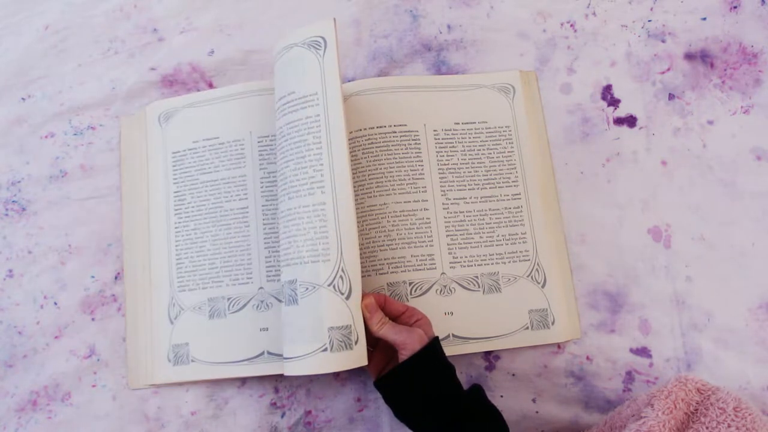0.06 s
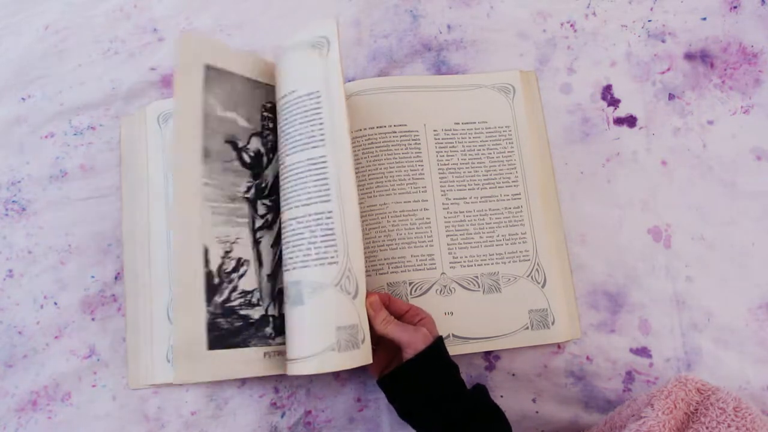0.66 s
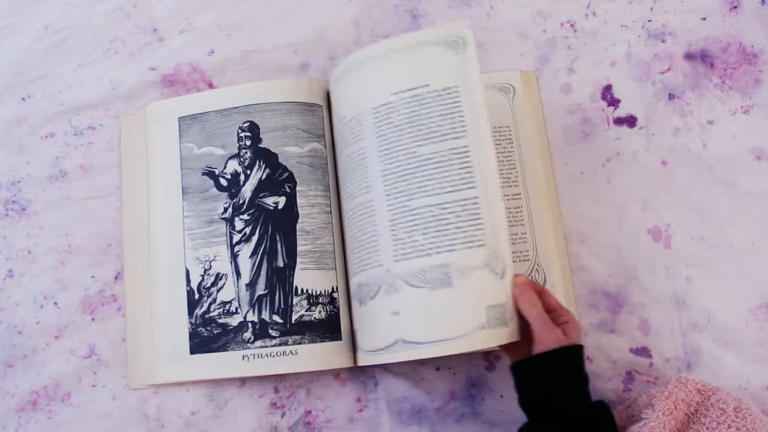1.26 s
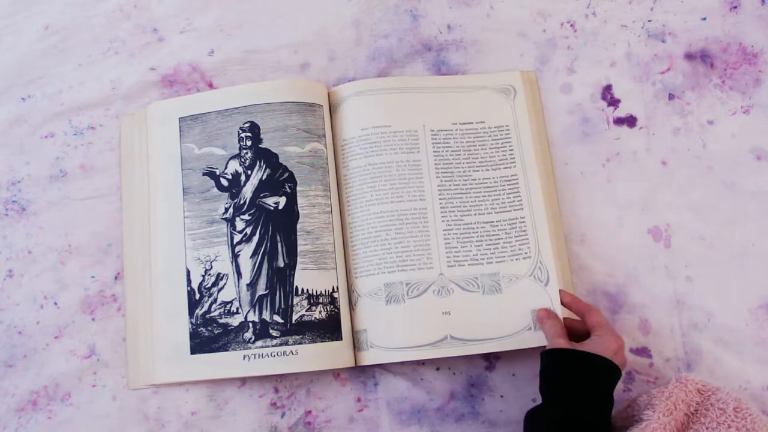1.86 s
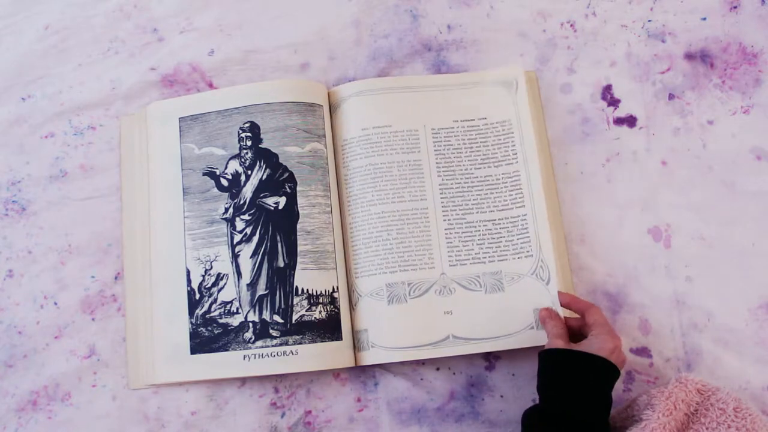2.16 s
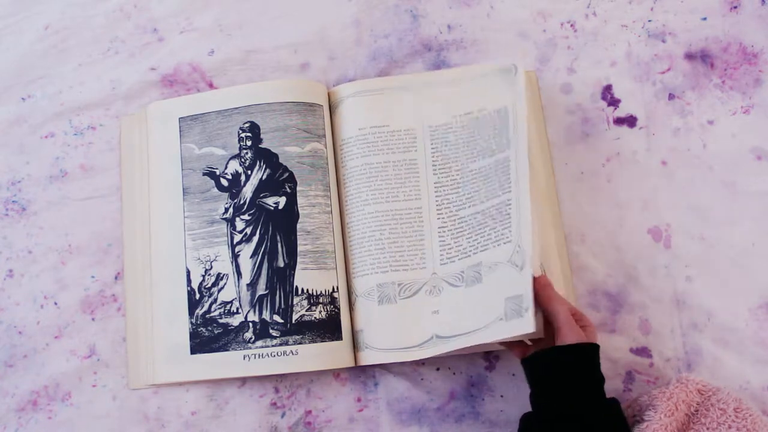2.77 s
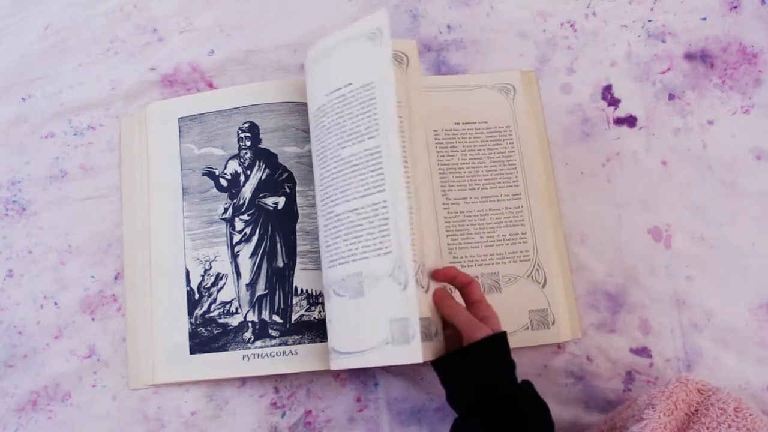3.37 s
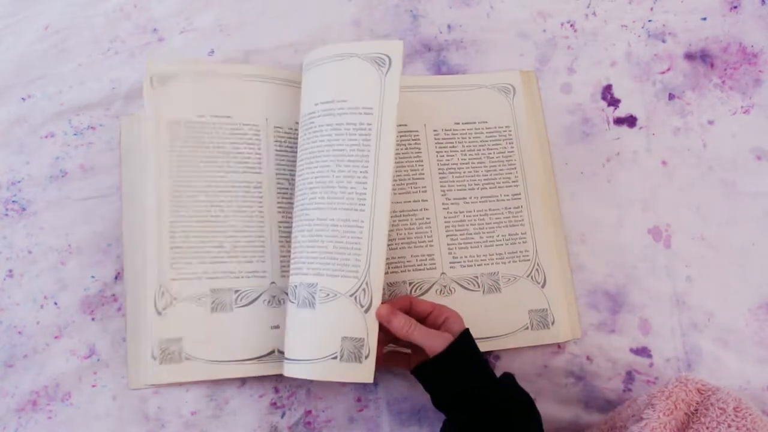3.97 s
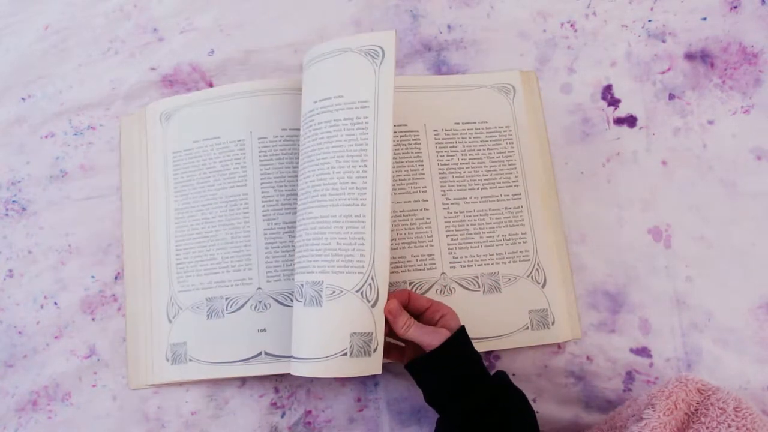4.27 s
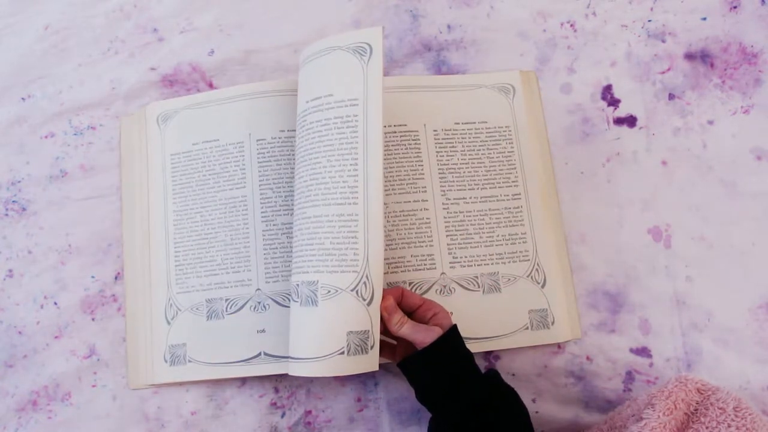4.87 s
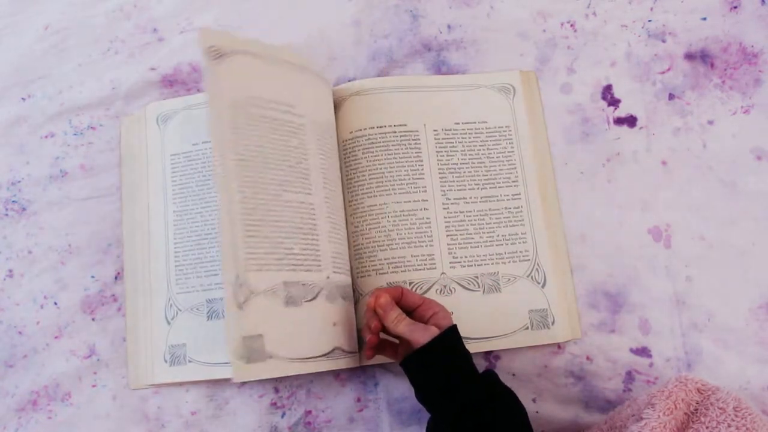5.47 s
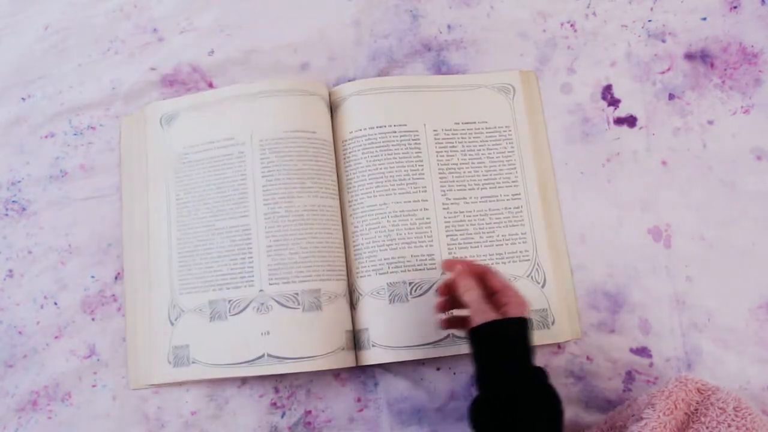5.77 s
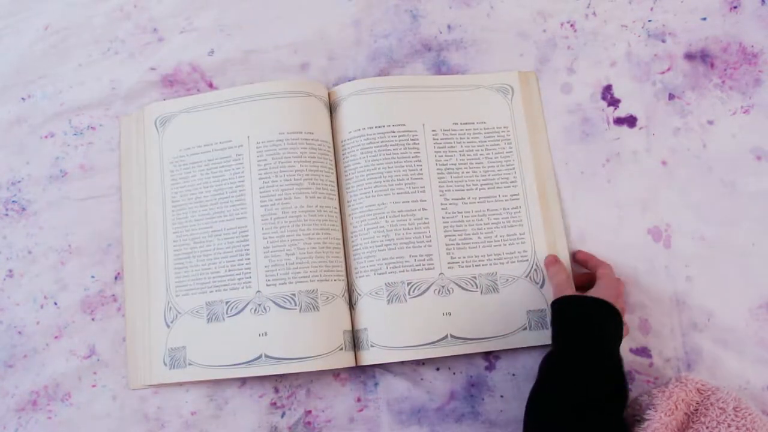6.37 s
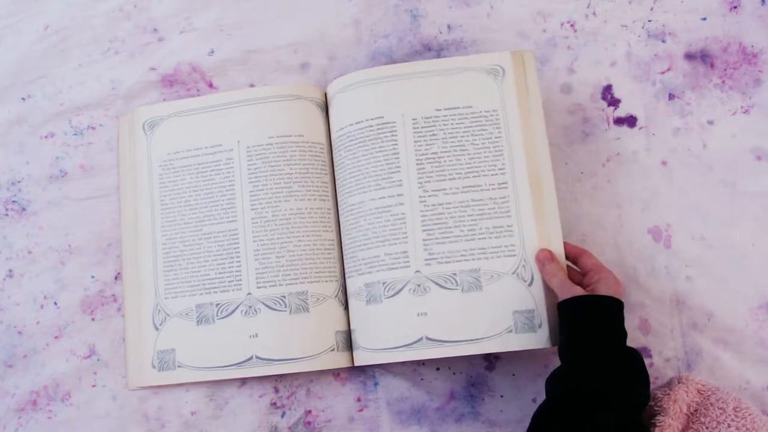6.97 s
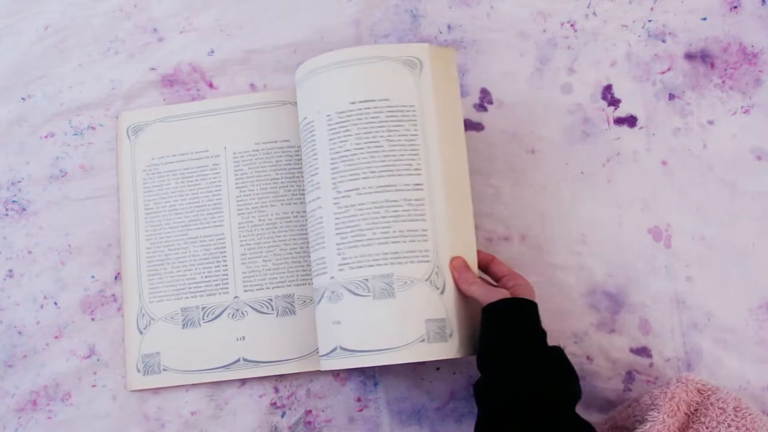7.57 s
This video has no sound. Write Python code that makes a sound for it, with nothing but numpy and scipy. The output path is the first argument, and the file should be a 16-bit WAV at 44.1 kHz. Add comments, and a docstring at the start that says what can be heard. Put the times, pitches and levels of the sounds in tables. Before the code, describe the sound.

Close paper sounds as someone leafs through a big book: sheets buckle, rub over each other and flop down, ringing slightly in the room.

```python
"""Pages of a large old book are turned by hand, close to the microphone, in a quiet but live room. First a page
edge brushes the fingers. Near 1.7 s the sheet buckles with dull snaps, and from 2.1 s it slides over its
neighbour with a hiss. More snaps and a softer slide follow from 3.1 s. Near 5.3 s a page is let go and flops
over; faint brushes and fingers rubbing the paper end the scene. The room rings on after every sound, over a
steady rumble and microphone hiss."""
import sys
import numpy as np
from scipy import signal
from scipy.fft import rfft, irfft, next_fast_len
from scipy.io import wavfile

SR = 44100
rng = np.random.default_rng(int(sys.argv[2]) if len(sys.argv) > 2 else 0)


def store_wav(level_fs):
    """Save 16-bit WAV to argv[1]."""
    pcm = np.round(np.clip(np.atleast_2d(level_fs), -1, 1) * 32767)
    wavfile.write(sys.argv[1], SR, pcm.T.astype(np.int16))


N = 340893
TIME_S = np.arange(N) / SR

# A bent sheet buckles. Each row: peak time in seconds, level in dB, centre in Hz, width in octaves,
# decay in seconds.
BUCKLE_EVENTS = [ (0.991, -54, 1270, 0.7, 0.021), (1.541, -60, 760, 0.6, 0.027),
                 (1.597, -54.5, 800, 0.78, .016), (1.6513, -25, 1220, 1.04, 0.0054),
                 (1.677, -23, 1110, 1.18, 0.0094), (1.901, -43, 1000, 1.32, 0.033),
                 (2.2401, -29.5, 2500, 1.47, 0.0037), (2.248, -44.5, 1110, 0.65, 0.029),
                 (2.278, -63, 2390, 1.3, 0.0021), (2.316, -36, 2300, 1.1, 0.0016),
                 (2.671, -48.5, 806, 1.4, 0.017), (3.0718, -30, 1420, 1.14, 0.0045),
                 (3.095, -44, 1000, 1.2, .02), (3.145, -40.5, 1170, 2.24, 0.015),
                 (3.156, -37.5, 1120, 1.95, 0.014), (3.215, -47, 970, 1.5, 0.061),
                 (3.549, -42.5, 760, 1.4, 0.01), (4.103, -59, 1000, 0.78, 0.032),
                 (5.111, -46.5, 1150, 1.4, 0.012), (5.151, -47, 1140, 1.65, 0.044),
                 (5.248, -28, 1520, 1.3, 0.0066), (5.273, -32, 2790, 0.62, 0.0045),
                 (5.75, -62, 1640, 0.29, .015), (6.279, -66.5, 770, .6, .02),
                 (6.8485, -45.5, 1190, 0.43, 0.0017)]
# A sheet slides over the next; the faint rows near 1.1, 1.6 and 6.65 s are fingers rubbing the paper. # Each
# row: peak time in seconds, level in dB, decay in seconds, relative hiss in dB, name of the rub colour.
SLIDE_EVENTS = [ (1.12, -67.5, 0.28, -7.5, "broad"), (1.58, -71, 0.21, 5.5, "broad"),
                (2.109, -37.5, 0.086, -23, "narrow"), (2.25, -40, 0.067, -20.5, "narrow"),
                (2.37, -42, 0.021, -6.5, "bright"), (2.422, -48, 0.11, -9, "bright"),
                (2.615, -52, 0.065, -13.5, "narrow"), (2.815, -61, 0.036, -12, "narrow"),
                (3.267, -52.5, 0.28, -11, "broad"), (3.554, -42, .02, -19.5, "broad"),
                (3.668, -54.5, 0.07, -3, "broad"), (3.882, -62, 0.064, -4, "broad"),
                (6.65, -71.5, .45, -6, "broad")]
# A page edge brushes past. Each row: peak time in seconds, level in dB, centre in Hz, decay in seconds,
# relative hiss in dB.
BRUSH_EVENTS = [ (0.073, -55.5, 2300, 0.041, -13), (0.141, -57.5, 2300, 0.037, -8.5),
                (0.453, -34, 2560, .001, -4), (0.47, -57, 2000, .05, -22), (1.663, -54, 3900, 0.067, -7),
                (1.836, -57.5, 4000, 0.049, -7), (1.984, -50.5, 3600, 0.0057, -6.5),
                (2.032, -44.5, 3870, .024, -10.5), (4.394, -52.5, 3400, 0.022, -11),
                (5.088, -51, 2730, 0.0024, -2), (5.099, -48, 2750, .005, -4.5),
                (5.107, -40, 2800, .005, -12.5), (5.881, -53.5, 2550, 0.011, 0),
                (5.911, -52, 3250, 0.025, -5), (6.022, -56.5, 3600, .003, -10)]
# Narrow resonances heard as a brief ring. Each row: frequency in Hz, width in Hz, relative gain in dB.
RING_MODES = [(685, 22, 0.5), (717, 33, 7.5), (815.4, 18, 12.5), (825, 140, 3), (895, 29, 8.5),
              (1133, 21, -18), (1158, 46, 1), (1259, 39, 11.5), (1379, 34, 7.5), (1516, 17, -2.5),
              (1607, 9, -12.5), (1600, 13, -0.5), (1704, 23, 8), (1806, 22, -2.5), (1930, 19, 1.5),
              (2054, 34, 3.5), (2380, 110, 1), (2600, 45, -2.5), (2780, 61.5, -14)]
# Colours of a slide's rub and hiss. Each row: frequency in Hz, relative level in dB.
NARROW_RUB_DB = [(400, -44), (1000, -18), (1500, -6), (2000, 3), (2450, 5), (3200, -2), (4000, -1),
                 (5000, -11.5), (6500, -28), (10000, -48)]
BRIGHT_RUB_DB = [(300, -22.5), (800, -24), (1300, -10.5), (1800, -3.5), (2500, -6.5), (3000, -2.5),
                 (4100, 0.5), (5500, -15), (8000, -15), (11000, -49)]
BROAD_RUB_DB = [(150, -24), (270, -7), (430, -11.5), (650, 2.5), (1000, -6.5), (1270, 0.5), (1700, -1.5),
                (2500, 1.5), (4500, -5), (8000, -39), (11000, -27)]
SLIDE_HISS_DB = [(3500, -25.5), (5500, -13.5), (6700, -14), (7800, -13), (9100, -15), (10300, -12.5),
                 (11800, -19.5), (15500, -22)]
# Colours of the flop's flap and crinkle. Each row: frequency in Hz, relative level in dB.
FLAP_COLOUR_DB = [(30, -60), (130, -26.5), (200, -17.5), (240, -7), (400, -3.5), (580, -4.5), (780, -7),
                  (1050, -3), (1300, -2.5), (1700, -0.5), (2100, -6.5), (2900, -30), (4000, -55.5)]
CRINKLE_COLOUR_DB = [(1200, -26), (1800, -1.5), (2150, -3), (2800, -2.5), (3300, -14.5), (4000, -19),
                     (4800, -36), (6000, -82), (9000, -47)]
# Room decay. Each row: frequency in Hz, time to fall 60 dB in seconds.
ROOM_T60_S = [(150, 1.5), (400, 0.68), (1040, 0.8062), (2760, 0.59), (7000, 1.23), (15000, 2.05)]
# Colours of the room's tail and of the noise floor. Each row: frequency in Hz, relative level in dB.
TAIL_COLOUR_DB = [(100, 7.5), (260, -1), (900, 0), (2500, 1), (6000, -2), (15000, -15)]
FLOOR_COLOUR_DB = [(22, -30), (38, -20.5), (50, -15), (64, 2), (110, 4.5), (180, 1.5), (400, -1),
                   (1000, -5), (2800, -8.5), (4400, -5.5), (6200, -9.5), (9000, -12), (12000, -10),
                   (15500, -7.5)]
# Stereo width of the noise floor. Each row: frequency in Hz, side relative to mid in dB.
FLOOR_SIDE_DB = [(60, -7), (180, -6), (550, -3.5), (1650, -1), (4970, -1), (15000, -1)]

HARD_BUCKLE_DB = -21.5   # reference for ring, crack and settling


def buckles():
    """A fold pops in a band set by its size, with a crack above and a thud of the whole sheet below."""
    out, texture = np.zeros(N), fibre_slips(spread_db=2, rate_hz=600)
    for peak_s, db, hz, octaves, rise_s, decay_s in buckles_with_settling():
        span, force, force_rms = slip_burst(texture, peak_s, rise_s, decay_s, snap=3.3)
        hardness_db = db - HARD_BUCKLE_DB
        fold = band(force, *band_edges_hz(hz, octaves), order=3)
        pop = unit_rms(short_ring(fold, ring_db=-3 + 0.28 * hardness_db))
        crack = unit_rms(band(force, low_hz=2160, top_hz=3500, order=3))
        thud = unit_rms(band(force, low_hz=270, top_hz=696, order=3))
        crack_gain = from_db(-16.5 + 0.42 * hardness_db)
        thud_gain = from_db(-8.5 - 11 * np.log2(hz / 1000))   # small, high folds shake the sheet less
        out[span] += from_db(db) * force_rms * (pop + crack_gain * crack + thud_gain * thud)
    return out


def buckles_with_settling():
    """Each buckle, then the softer flutter as the sheet settles; hard buckles shake it much more."""
    delay_s, flutter_rise_s, flutter_decay_s = 0.057, 0.022, 0.06
    flutter_hz, flutter_octaves = 1205, 1.7
    for peak_s, db, hz, octaves, decay_s in BUCKLE_EVENTS:
        yield peak_s, db, hz, octaves, 0.66 * decay_s, decay_s
        flutter_db = -42 + 1.67 * (db - HARD_BUCKLE_DB)
        yield peak_s + delay_s, flutter_db, flutter_hz, flutter_octaves, flutter_rise_s, flutter_decay_s


def flop(peak_s=5.265, landing_s=0.29):
    """The free page unrolls in dense soft buckles; the air pocket under it adds a hollow note."""
    t_s = TIME_S - peak_s
    landing_fade = np.exp(-(t_s / landing_s) ** 2)
    flap_gain = from_db(-28) * swell(t_s, rise_s=0.026, decay_s=0.23) * landing_fade
    flap_noise = coloured(fibre_slips(spread_db=0.4, rate_hz=440), FLAP_COLOUR_DB)
    flap = flap_gain * unit_rms(short_ring(flap_noise, ring_db=-3))
    crinkle_gain = from_db(-33) * swell(t_s, rise_s=0.014, decay_s=0.086)
    crinkle_noise = coloured(fibre_slips(spread_db=1, rate_hz=600), CRINKLE_COLOUR_DB)
    air_pocket = from_db(8) * resonance(flap, hz=280, width_hz=7)
    return flap + air_pocket + crinkle_gain * unit_rms(crinkle_noise)


def slides():
    """Paper on paper, or fingers on paper, in dense fine slips: a mid rub from the sheet, a hiss from its edge."""
    friction = moving_contact(fibre_slips(spread_db=1, rate_hz=700), depth=0.56)
    rubbing = short_ring(friction, ring_db=-12.5)
    hiss = unit_rms(coloured(friction, SLIDE_HISS_DB))
    colours = {"narrow": NARROW_RUB_DB, "bright": BRIGHT_RUB_DB, "broad": BROAD_RUB_DB}
    rubs = {name: unit_rms(coloured(rubbing, colour)) for name, colour in colours.items()}
    out = np.zeros(N)
    for peak_s, db, decay_s, hiss_db, name in SLIDE_EVENTS:
        envelope = swell(TIME_S - peak_s, 0.33 * decay_s, decay_s)
        out += from_db(db) * envelope * (rubs[name] + from_db(hiss_db) * hiss)
    return out


def moving_contact(x, depth):
    """As the line of contact moves, narrow peaks and dips come and go in the scrape."""
    centres_hz = np.geomspace(1900, 14000, 12)
    return x + depth * sum(drift(rate_hz=7.6) * resonance(x, hz, 0.039 * hz) for hz in centres_hz)


def brushes():
    """A page edge scratches the fingers, with fine hiss above and a little sheet body below."""
    out, texture = np.zeros(N), fibre_slips(spread_db=4, rate_hz=900)
    for peak_s, db, hz, decay_s, hiss_db in BRUSH_EVENTS:
        span, force, force_rms = slip_burst(texture, peak_s, 0.37 * decay_s, decay_s, snap=1.5)
        edge = band(force, *band_edges_hz(hz, octaves=1.66), order=3)
        scratch = unit_rms(short_ring(edge, ring_db=-2.5))
        hiss = from_db(hiss_db) * unit_rms(band(force, low_hz=6440, top_hz=12300))
        body = from_db(-11.5) * unit_rms(band(force, low_hz=392, top_hz=1240))
        out[span] += from_db(db) * force_rms * (scratch + hiss + body)
    return out


def fibre_slips(spread_db, rate_hz):
    """Paper fibres catch and let go: noise whose strength jumps from slip to slip."""
    slip_index = np.cumsum(rng.random(N) < rate_hz / SR)
    strength = from_db(spread_db * np.clip(rng.standard_normal(SR), -2, 2))
    return unit_rms(rng.standard_normal(N) * strength[slip_index % SR])


def slip_burst(texture, peak_s, rise_s, decay_s, snap):
    """Slips swell to one sudden give and fade; returns sample span, force and envelope rms."""
    start_s, end_s = max(peak_s - 6 * rise_s, 0), peak_s + 6 * decay_s + 0.12
    span = slice(int(start_s * SR), int(end_s * SR))
    envelope = swell(TIME_S[span] - peak_s, rise_s, decay_s)
    force = envelope * texture[span]
    force[np.argmax(envelope)] += snap
    return span, force, np.sqrt(np.mean(envelope ** 2))


def short_ring(x, ring_db):
    """Narrow resonances that add a brief ring to the paper sounds."""
    return x + sum(from_db(db + ring_db) * resonance(x, hz, width_hz) for hz, width_hz, db in RING_MODES)


def room_reverb(x, side_db):
    """The room's reflections: a nearly centred stereo tail, one second long."""
    send = coloured(x, TAIL_COLOUR_DB)
    mid, side = (signal.oaconvolve(send, diffuse_tail(TIME_S[:SR]))[:N] for _ in range(2))
    return mid + from_db(side_db) * side * [[1], [-1]]


def diffuse_tail(t_s, onset_s=0.0013):
    """Dense reflections, each octave dying at its own rate; unit energy."""
    white, edges_hz = rng.standard_normal((2, len(t_s))), np.geomspace(90, 18000, 9)
    tail = np.zeros(len(t_s))
    for k, (low_hz, top_hz) in enumerate(zip(edges_hz, edges_hz[1:])):
        t60_s = at_hz(ROOM_T60_S, np.sqrt(low_hz * top_hz))
        tail += band(white[k % 2], low_hz, top_hz) * from_db(-60 * t_s / t60_s)
    return unit_rms(tail * (1 - np.exp(-t_s / onset_s))) / np.sqrt(len(t_s))


def room_tone(mid_db):
    """Low rumble, mostly shared by both sides, under the microphone's own hiss."""
    mid, side = (unit_rms(coloured(white, FLOOR_COLOUR_DB)) for white in rng.standard_normal((2, N)))
    return from_db(mid_db) * (mid + coloured(side, FLOOR_SIDE_DB) * [[1], [-1]])


def swell(t_s, rise_s, decay_s):
    """Exponential rise to one at time zero, then exponential decay."""
    return np.exp(np.minimum(t_s / rise_s, -t_s / decay_s))


def drift(rate_hz):
    """Slow random wander, unit rms."""
    steps = rng.standard_normal(int(TIME_S[-1] * 40) + 2)
    return unit_rms(np.interp(TIME_S * rate_hz, np.arange(len(steps)), steps))


def resonance(x, hz, width_hz):
    """Two-pole resonator, unit peak gain."""
    radius, angle_rad = np.exp(-np.pi * width_hz / SR), 2 * np.pi * hz / SR
    gain = (1 - radius ** 2) / 2
    return signal.lfilter([gain, 0, -gain], [1, -2 * radius * np.cos(angle_rad), radius ** 2], x + 1e-18)


def band(x, low_hz, top_hz, order=2):
    """Causal band-pass."""
    top_hz = np.clip(top_hz, low_hz + 50, 0.45 * SR)
    return signal.sosfilt(signal.butter(order, [low_hz, top_hz], "band", fs=SR, output="sos"), x)


def band_edges_hz(centre_hz, octaves):
    """Low and top edge of a band."""
    return centre_hz * 2 ** (-octaves / 2), centre_hz * 2 ** (octaves / 2)


def coloured(x, colour_db):
    """Zero-phase filter from a colour table."""
    size = next_fast_len(len(x), True)
    gain = from_db(at_hz(colour_db, np.fft.rfftfreq(size, 1 / SR)))
    return irfft(rfft(x, size) * gain, size)[:len(x)]


def at_hz(table, hz):
    """Interpolate a table along log frequency."""
    table_hz, values = np.transpose(table)
    return np.interp(np.log(np.maximum(hz, 1)), np.log(table_hz), values)


def from_db(db):
    """Decibels to gain."""
    return 10 ** (np.asarray(db) / 20)


def unit_rms(x):
    """Scale to an rms of one."""
    return x / np.sqrt(np.mean(x ** 2) + 1e-20)


def scene():
    """All paper sounds come from near the middle and excite the room."""
    snaps, edges, rubs, fall = buckles(), brushes(), slides(), flop()
    direct = (snaps + edges + rubs + fall) * from_db([[0.15], [-0.15]])
    send = from_db(-4) * snaps + from_db(-1) * edges + from_db(-4.5) * rubs + from_db(-9.5) * fall
    return direct + room_reverb(send, side_db=-7.5) + room_tone(mid_db=-65)


def record(dry):
    """Steep low-pass on the top treble."""
    cutoff_hz = 15800
    return signal.sosfilt(signal.ellip(12, 0.1, 80, cutoff_hz, fs=SR, output="sos"), dry)


dry = scene()
out = record(dry)
store_wav(out)
```